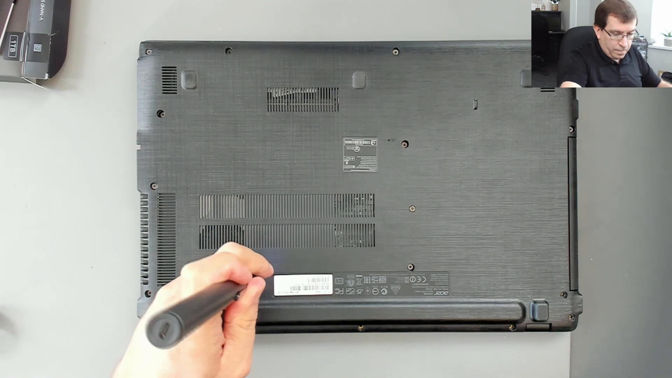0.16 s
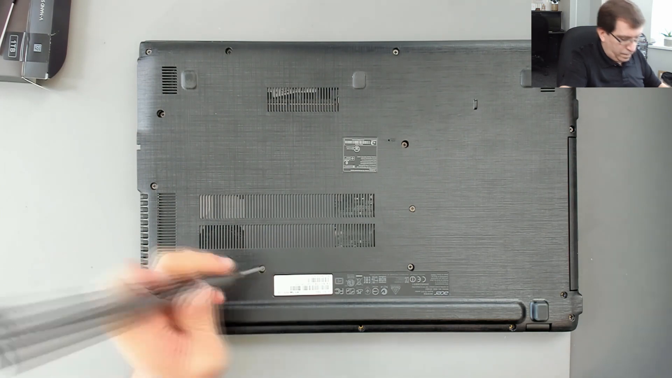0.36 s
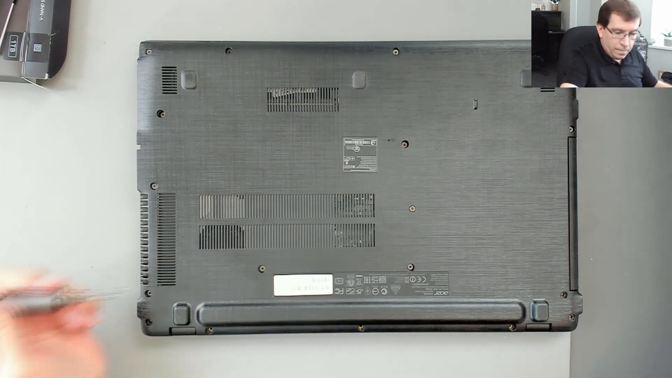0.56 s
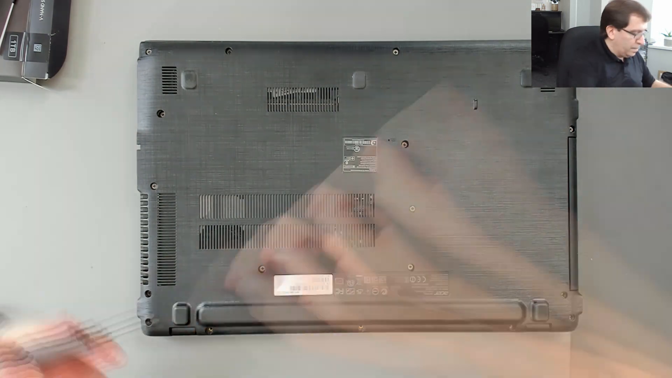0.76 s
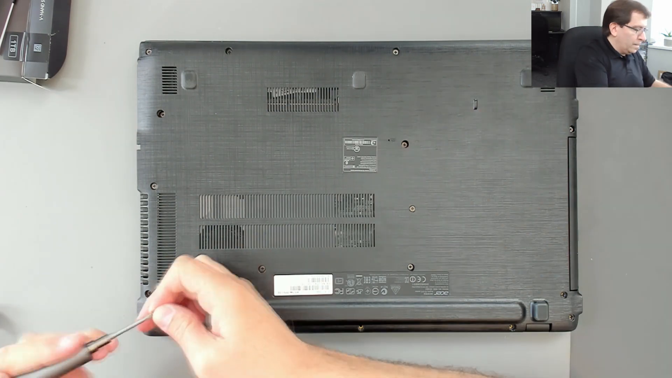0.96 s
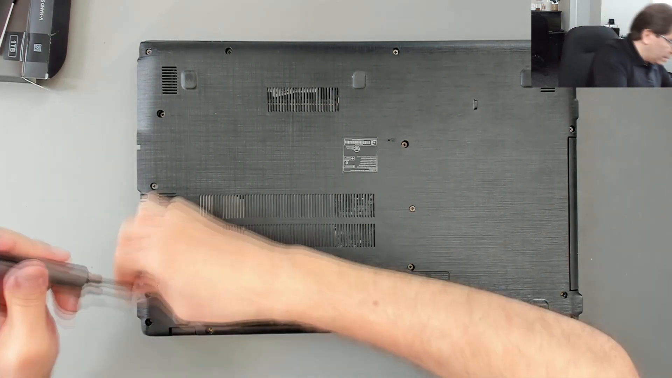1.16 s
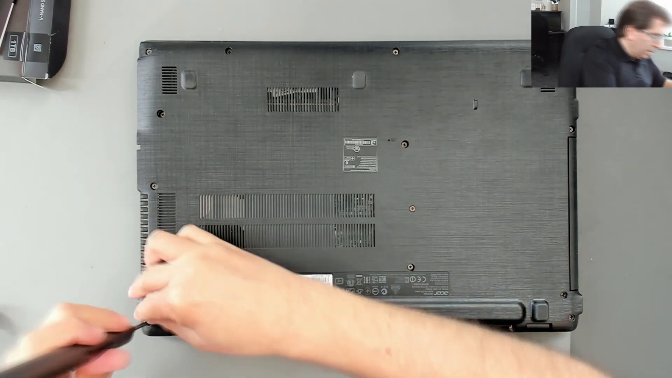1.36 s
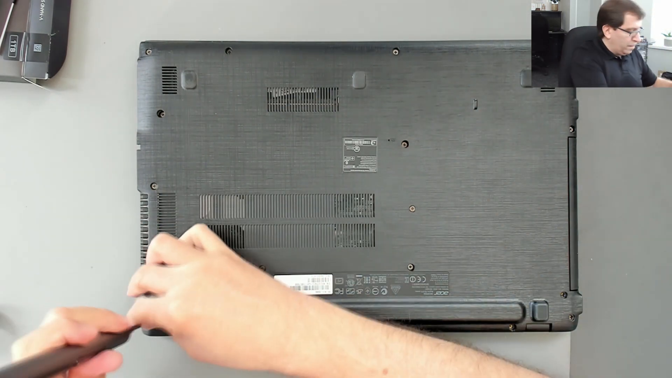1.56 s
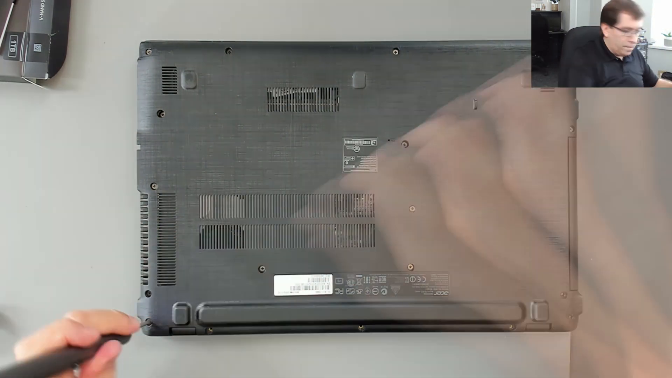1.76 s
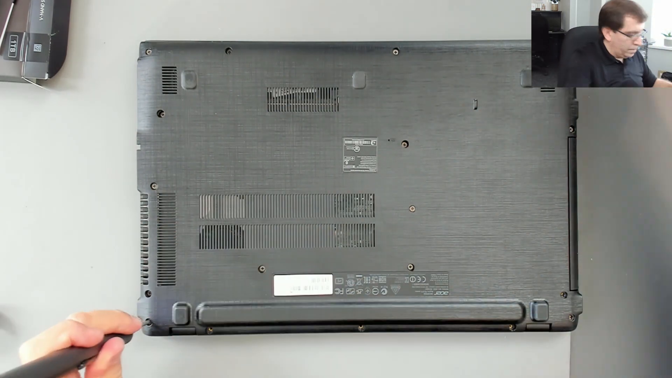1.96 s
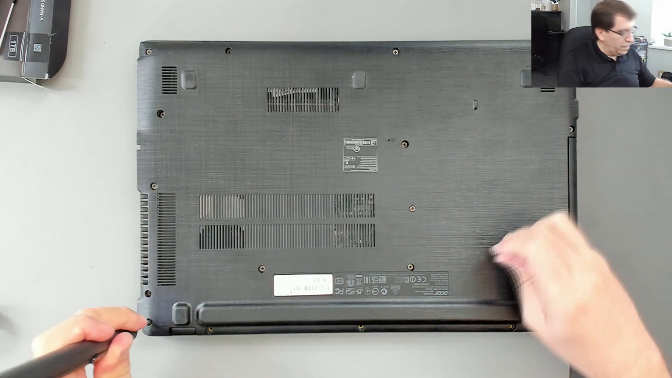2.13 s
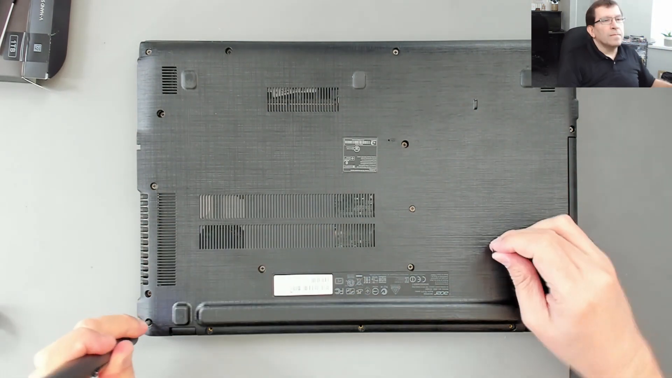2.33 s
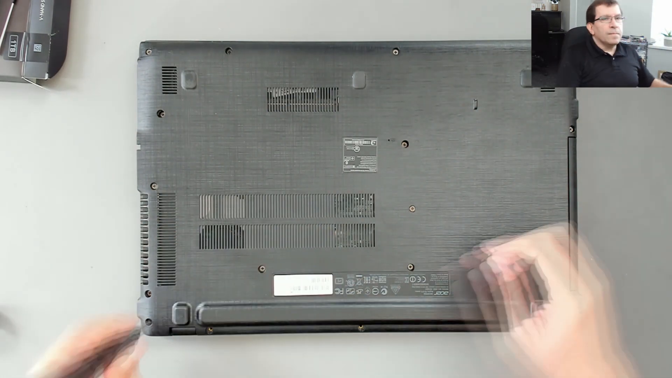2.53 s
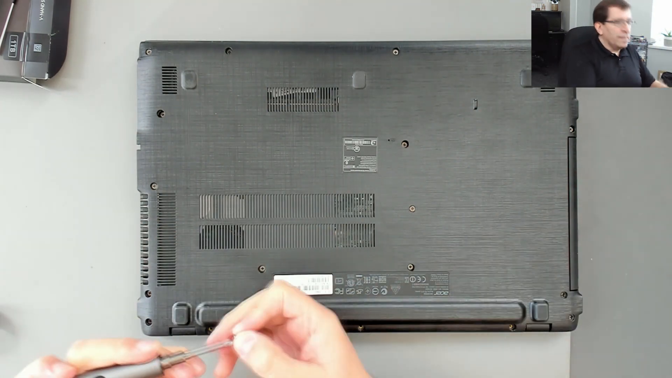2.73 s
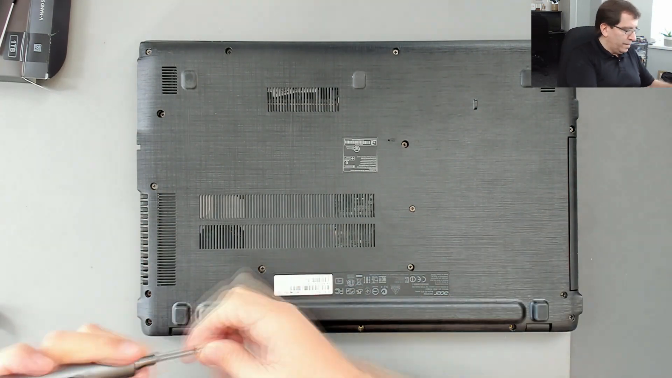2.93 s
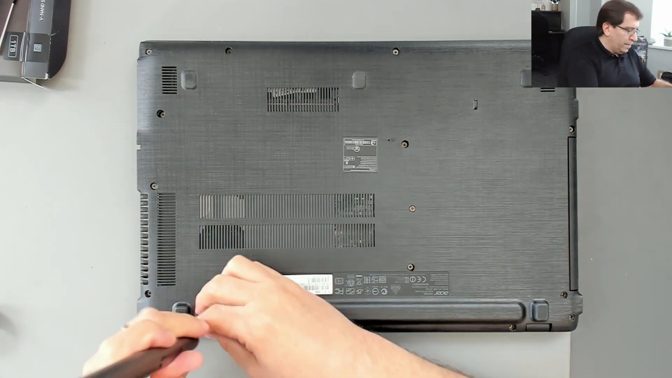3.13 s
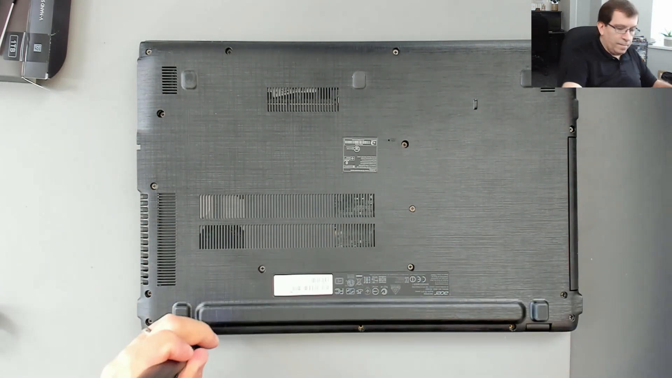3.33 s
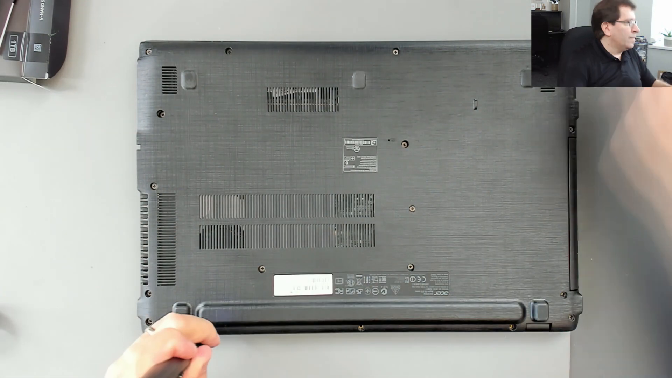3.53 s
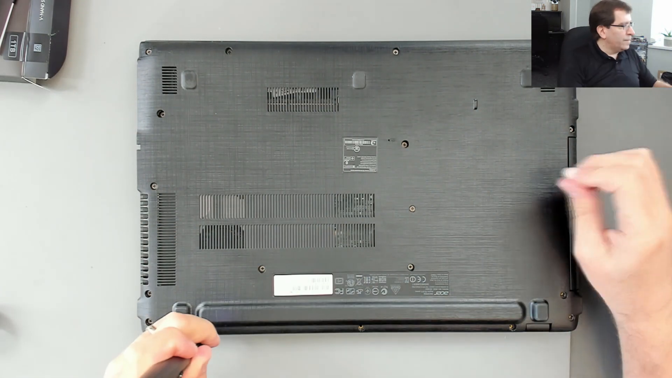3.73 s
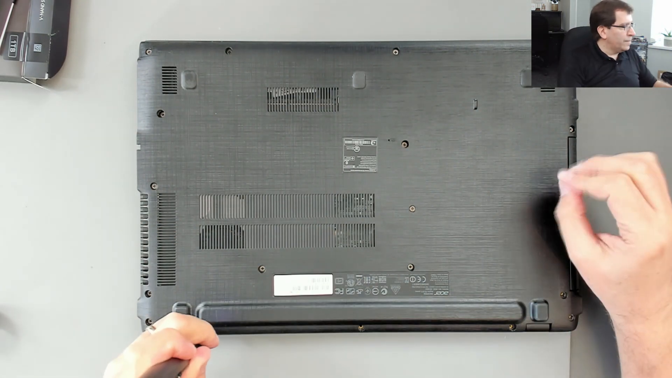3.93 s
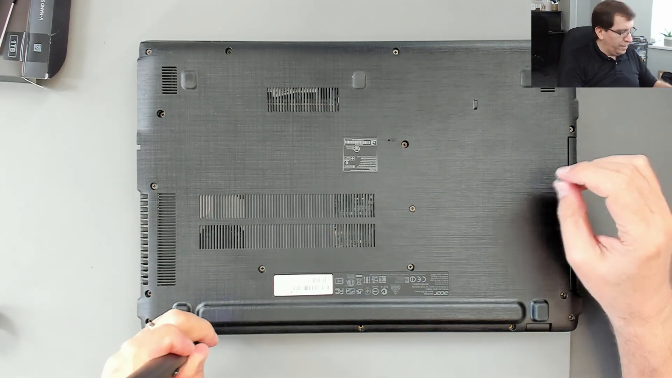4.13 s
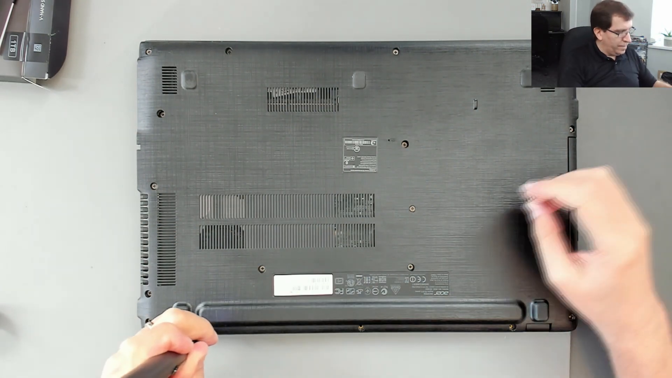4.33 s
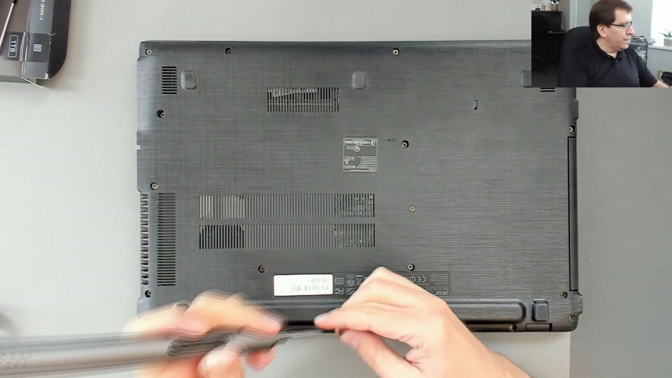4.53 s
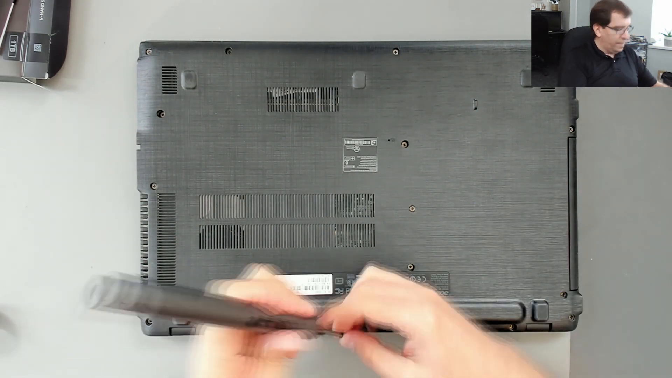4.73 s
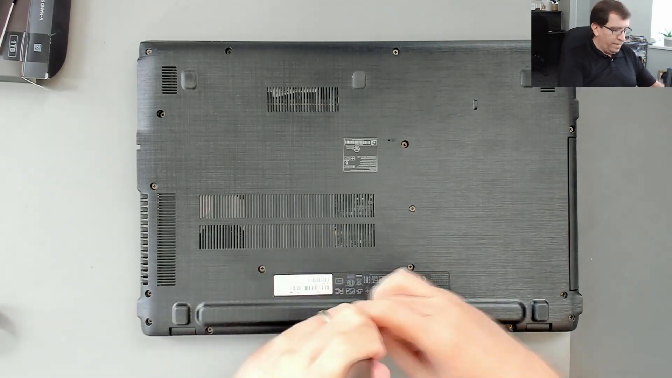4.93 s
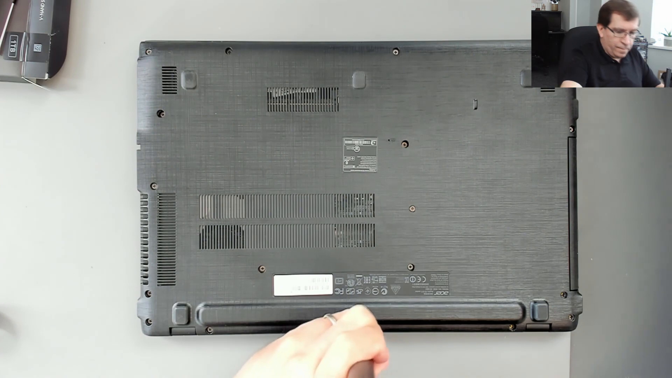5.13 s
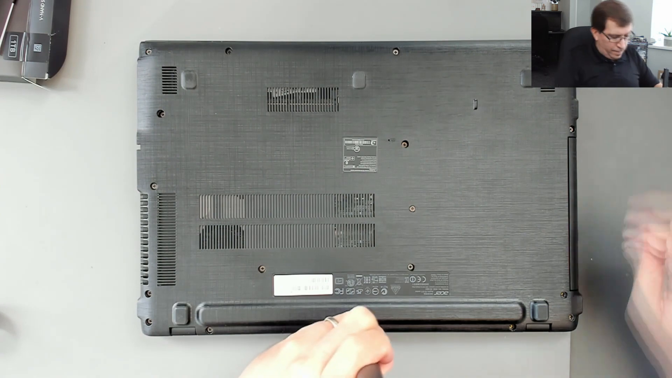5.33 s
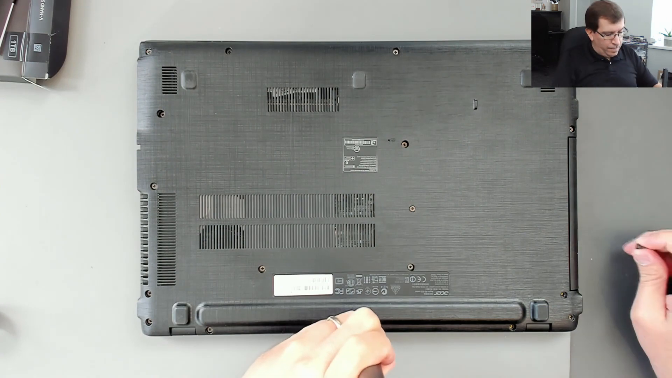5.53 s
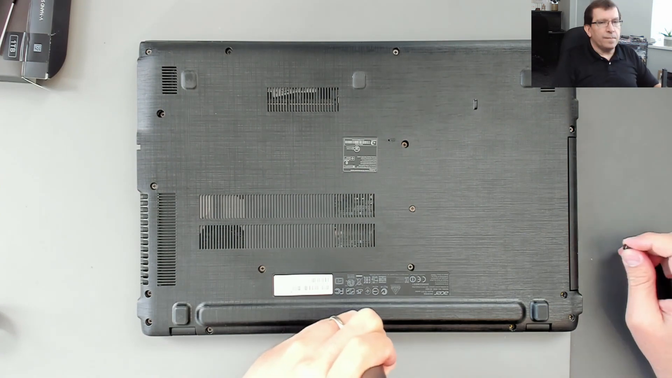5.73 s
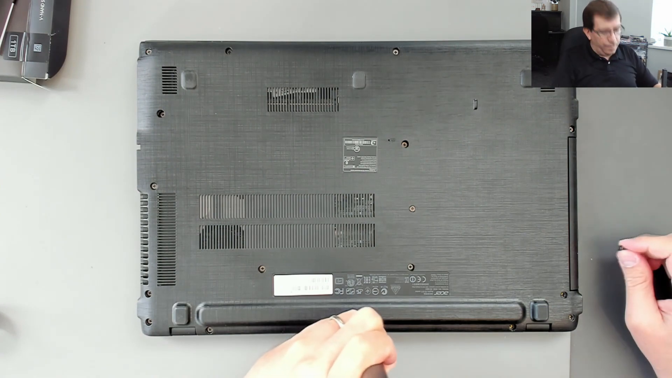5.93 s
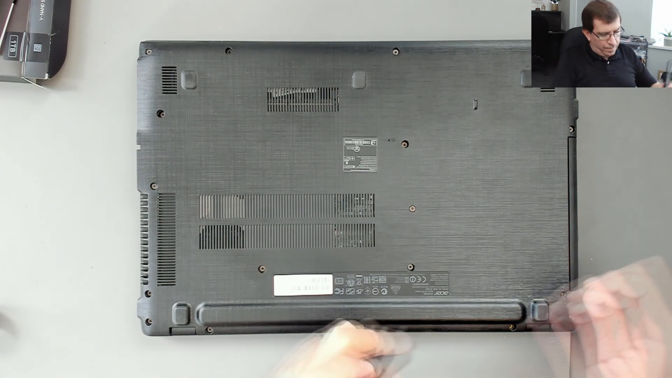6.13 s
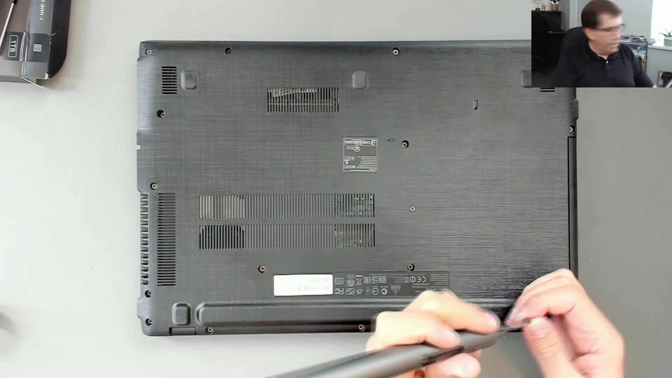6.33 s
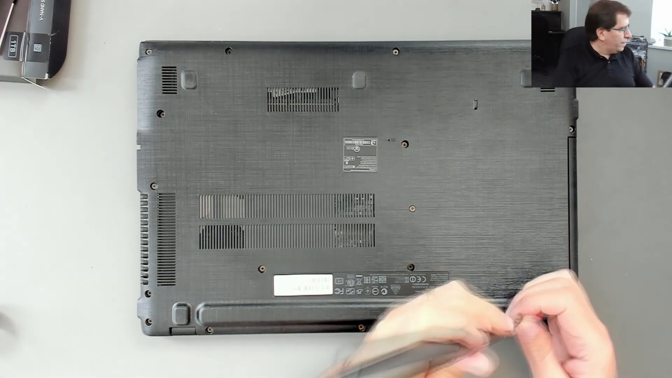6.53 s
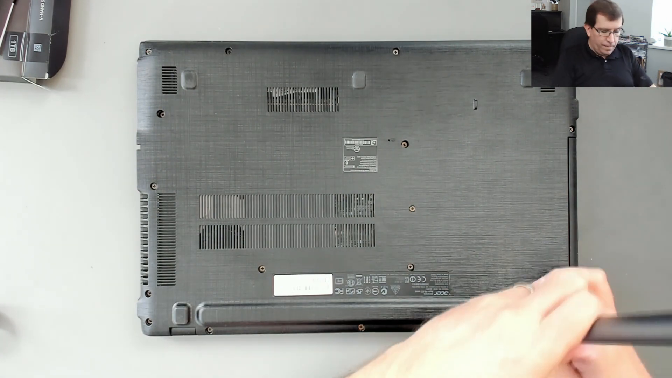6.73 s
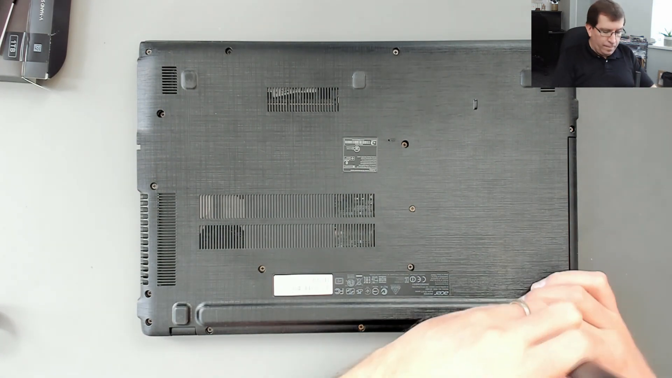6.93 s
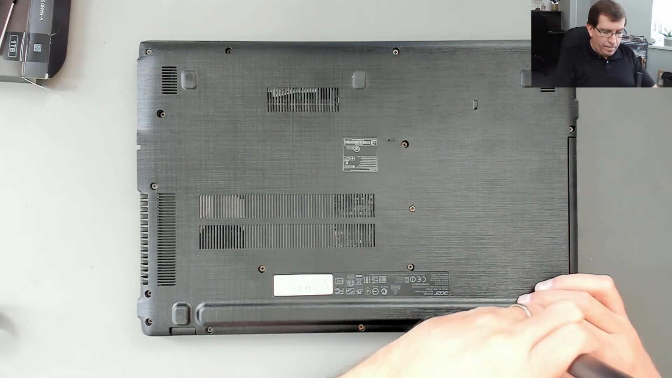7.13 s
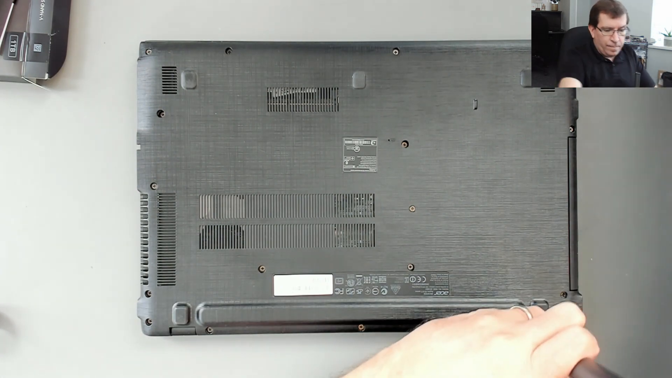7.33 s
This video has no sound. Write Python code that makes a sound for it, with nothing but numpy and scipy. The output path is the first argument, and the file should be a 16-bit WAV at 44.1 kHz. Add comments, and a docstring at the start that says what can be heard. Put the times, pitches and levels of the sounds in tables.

```python
"""A thin motor whine and a gritty gear rasp: a pen-sized electric screwdriver drives screws into a
laptop's plastic cover in five short runs. The motor sags under load while tiny gear teeth rattle the
barrel. Between runs the bit knocks into the next screw head and rings the laptop, hands brush the cover
and the bench rumbles. One close microphone in a quiet room."""
import sys
import numpy as np
from scipy import signal
from scipy.fft import rfft, irfft
from scipy.io import wavfile
from scipy.ndimage import uniform_filter1d

SR = 44100
rng = np.random.default_rng(int(sys.argv[2]) if len(sys.argv) > 2 else 0)


def generate_wav(sig):
    """Save sig (samples, or channels by samples) to the path in sys.argv[1] as 16-bit PCM at SR."""
    pcm = np.round(np.clip(np.atleast_2d(sig).T, -1, 1) * 32767).astype(np.int16)
    wavfile.write(sys.argv[1], SR, pcm)


N = 325458
TIME = np.arange(N) / SR

# Table levels are relative: each layer adds its own trim.
# trigger pulls: on/s, off/s, growl/dB, rasp/dB, sizzle/dB, rise of rasp and sizzle/(dB/s)
RUNS = [(-0.07, 0.253, -44.5, -46, -45, 11), (1.743, 2.517, -47, -47.5, -51, 9),
        (3.236, 4.413, -46.5, -43.5, -45.5, 2.5), (5.041, 6.107, -43.5, -45, -46.5, 7),
        (7.078, 7.402, -45.5, -46, -46.5, 23)]
# motor curves, one table a run: t/s, whine pitch/Hz, wobble/Hz, level/dB, gear strain (0-1)
MOTOR = [
    [(0.0, 651.5, 2, -50.5, 0), (0.15, 638, 3.5, -47, 0.77), (0.24, 634, 3, -51, 0.6),
     (0.275, 616, 3, -69, 0.6)],
    [(1.8, 612, 2, -51.5, 0.7), (1.93, 638.3, 2.3, -57.5, 0), (2.07, 634.7, 3, -55, 0.02),
     (2.13, 631, 5.55, -47.5, .1), (2.32, 625.7, 3.5, -42.5, 0.4), (2.46, 633.4, 6, -49, 0.01),
     (2.54, 582, 3.7, -63, 0.26)],
    [(3.27, 609, 2.96, -52, 0.5), (3.34, 628.7, 5, -38.5, 0.17), (3.53, 629.5, 6.7, -35.5, 0.3),
     (3.62, 625.2, 6, -36.5, 0.5), (3.74, 625, 5.5, -35.5, 0.72), (3.84, 603.4, 2, -43, 0.86),
     (3.97, 576.2, 2.4, -52, 0.88), (4.18, 596, 2, -43, 0.99), (4.28, 610.4, 1.8, -46, 0.86),
     (4.375, 623.5, 1.4, -41.5, 1), (4.42, 609.6, 2, -84, 0.8)],
    [(5.09, 621, 5, -47.5, 0.3), (5.15, 634.4, 5, -42.5, 0.61), (5.35, 643.3, 3.8, -40, 0.3),
     (5.58, 643, 6, -40, 0), (5.73, 629.3, 11, -44, 0.43), (5.85, 621, 15, -44.5, .2),
     (6.04, 621, 15, -44, 0), (6.125, 621, 8, -60, 0.1)],
    [(7.11, 636, 5.4, -52.5, 0.13), (7.185, 627, 9, -46.5, 0.69), (7.25, 639, 4, -41.5, 0.12),
     (7.38, 641.5, 3.5, -40, 0.51)],
]
# the grip in each run: level/dB of whine harmonics 1, 2, 3, 5, 6, 7, bench rumble/dB, cover shudder/dB
GRIPS = [(-9, 2, -7, 1, -13.5, -6.5, -42.5, -48), (-5, 1, -8.5, -23, -15.5, -15, -46, -42),
         (-9, 0.83, -2, -3.5, -22, -19, -42.5, -43), (-8, .5, .5, -2.5, -21, -8.5, -44.5, -46.5),
         (-12.5, 1.1, -3, 3.5, -13, -17, -42.5, -46)]
# bit and fingers strike the cover: t/s, boom/dB, thud/dB, clack/dB, tick/dB
KNOCKS = [(0.381, -48, -64, -50, -67), (0.737, -44, -51, -52, -77), (0.749, -50, -46, -47, -58),
          (1.342, -49, -41.5, -67, -78), (1.439, -50, -31, -44, -74), (1.479, -56, -31.5, -42, -55),
          (1.575, -54.5, -32, -46.5, -66), (1.634, -51, -32.5, -55, -65), (1.67, -30, -20, -40, -48),
          (1.684, -13.5, -15, -30, -30), (1.718, -17, -8.5, -27, -28.5), (1.808, -48, -33, -58, -66),
          (2.155, -46, -33.5, -50, -60), (2.276, -38, -35, -46, -62), (2.53, -45, -35.5, -48, -63),
          (3.002, -42, -60, -49, -53.5), (3.172, -30, -40, -38, -66), (3.188, -15, -28.5, -40, -44),
          (3.203, -29, -39, -33.5, -37.5), (4.48, -53, -52, -48, -44), (4.658, -71, -65, -77, -65),
          (4.704, -52, -60, -78, -62), (4.919, -54, -36, -37.5, -57), (4.981, -29, -32, -26.5, -40.5),
          (4.99, -13, -29, -26, -33), (5.005, -17, -51, -16, -32), (5.022, -38, -40, -22, -35),
          (5.116, -34.5, -48, -37.5, -29.5), (6.143, -59.5, -50, -36.5, -53), (6.166, -52, -54, -49, -37),
          (6.81, -44, -32, -54, -70), (6.93, -34, -39.5, -50, -62), (6.946, -46, -36.5, -49, -59),
          (7.035, -50, -29.5, -44, -49), (7.049, -33, -33, -27.5, -35)]


def from_db(db):
    """Decibels to gain."""
    return 10 ** (np.asarray(db) / 20)


def rms_one(x):
    """Scale to unit power."""
    return x / np.sqrt(np.mean(x ** 2) + 1e-20)


def cut(x, hz, kind, order=2):
    """Butterworth filter."""
    return signal.sosfilt(signal.butter(order, hz, kind, fs=SR, output="sos"), x)


def coloured(x, spectrum):
    """Shape a signal with an EQ curve of (f/Hz, level/dB) points; rms 1."""
    hz, db = np.transpose(spectrum)
    log_hz = np.log(np.arange(N // 2 + 1) * SR / N + 1e-3)
    gain = from_db(np.interp(log_hz, np.log(hz), db, left=-120, right=-120))
    return rms_one(irfft(rfft(x) * gain, N))


def noise(spectrum):
    """Steady noise of a given colour."""
    return coloured(rng.standard_normal(N), spectrum)


def drift(rate_hz):
    """Random wander, mostly slower than the given rate; rms 1."""
    hz = np.arange(N // 2 + 1) * SR / N
    return rms_one(irfft(rfft(rng.standard_normal(N)) / (1 + (hz / rate_hz) ** 2), N))


def gate(start, end, fade_s):
    """Fully open from start to end, with a linear fade on either side."""
    return np.clip(1 + np.minimum(TIME - start, end - TIME) / fade_s, 0, 1)


def per_run(values):
    """At each sample, the value that belongs to the latest run."""
    return np.asarray(values)[np.searchsorted([run[0] for run in RUNS[1:]], TIME)].T


def screwdriver(turn_s=0.103, jitter=0.0016, slip_skew=0.59, throb_db=3):
    """One shaft drives whine and gears; each turn it slows as the screw binds; the whine dips on the slip."""
    # one moment in each run when the screw slips free: t/s
    slips = [0.095, 2.296, 3.545, 5.853, 7.225]
    curve_s, *curves = np.vstack(MOTOR).T
    pitch, wobble_hz, whine_db, strain = (np.interp(TIME, curve_s, curve) for curve in curves)
    turn = 2 * np.pi * (TIME - per_run(slips)) / turn_s
    pitch += wobble_hz * (np.sin(turn) + slip_skew * np.sin(2 * turn))
    phase = 2 * np.pi * np.cumsum(pitch * (1 + jitter * drift(37))) / SR
    return whine(phase, whine_db - throb_db * np.cos(turn), strain) + gearbox(phase)


def whine(phase, whine_db, strain, trim_db=0.4, skirt_db=-19, skirt_hz=45, mesh_flutter_db=3.5):
    """Motor harmonics; play in the gears roughens the higher ones, and load brings out the tooth mesh."""
    # motor harmonics: multiple of the whine, gain at full strain/dB, flutter (0-1)
    harmonics = [(1, 1, .65), (2, -4.5, .25), (3, 3, .6), (5, -2.5, .65), (6, 2, .5), (7, 0, .5)]
    # tooth-mesh tones: multiple of the whine, free-running level/dB, strained level/dB
    mesh_tones = [(3.8, -78.5, -58.5), (4, -72.5, -49.5), (4.33, -72, -51), (10, -78, -55.5),
                  (12, -66, -45.5)]
    out = np.zeros(N)
    for (multiple, strain_db, flutter), grip_db in zip(harmonics, per_run(GRIPS)):
        angle = multiple * phase + rng.uniform(0, 2 * np.pi)
        skirt = np.sqrt(multiple) * (drift(skirt_hz) * np.sin(angle) + drift(skirt_hz) * np.cos(angle))
        # the loose bit carries each tone unevenly, so it flutters and briefly drops out
        contact = np.clip(1.05 + flutter * drift(20), 0.05, 1.4)
        tone = contact * np.sin(angle) + from_db(skirt_db) * skirt
        out += from_db(whine_db + grip_db + strain * strain_db + trim_db) * tone
    for multiple, free_db, strained_db in mesh_tones:
        level = from_db(free_db + strain * (strained_db - free_db) + mesh_flutter_db * drift(30))
        out += level * np.sin(multiple * phase + 0.63 * drift(60))
    motor_on = sum(gate(curve[0][0], curve[-1][0], fade_s=0.018) for curve in MOTOR)
    return np.sqrt(2) * out * motor_on


def worn_teeth(phase, cycles):
    """The same worn teeth come round every few cycles: a dense comb of faint overtones."""
    wear = signal.resample(rng.standard_normal(64 * cycles), 8 * 64 * cycles)
    revolutions = phase / (2 * np.pi * cycles)
    return rms_one(np.interp(revolutions, np.arange(len(wear)) / len(wear), wear, period=1))


def shifting_contacts(x, depth_db, width_hz=170, span_s=0.11, frame=1024):
    """Narrow bands swell and fade on their own as the contacts shift."""
    hz, t, bands = signal.stft(x, SR, nperseg=frame)
    swell = rng.standard_normal(bands.shape)
    for _ in range(2):
        swell = uniform_filter1d(swell, round(width_hz / hz[1]), axis=0)
        swell = uniform_filter1d(swell, round(span_s / t[1]), axis=1)
    return signal.istft(bands * from_db(depth_db * rms_one(swell)), SR, nperseg=frame)[1][:N]


def running(on, off, spin_up_s=0.047, coast_s=0.078):
    """The gears spin up, hold while the trigger is held, then coast to rest."""
    spin_up = np.clip((TIME - on) / spin_up_s, 0, 1)
    return spin_up * from_db(-60 * np.clip((TIME - off) / coast_s, 0, 2) ** 2)


def gearbox(phase, comb_db=-3, split_hz=6500, growl_db=2, rasp_db=0.5, sizzle_db=1.32,
            seating_db=0.5, seating_s=0.083, linger_s=0.011):
    """Tiny tooth impacts, partly repeating, rattle the barrel, brighter as the screw tightens."""
    # lower resonances of the barrel: f/Hz, level/dB
    barrel_colour = [(250, 1), (500, -4), (850, -10.5), (1100, -7.5), (1500, 3), (1900, 2.5), (2150, 3),
                     (2450, 0.5), (2850, -3), (3200, 3.5), (3600, -1), (4200, -28)]
    # gear treble, changing with the grip, one curve a run: f/Hz, level/dB
    treble_colours = [
        [(2060, -39), (3500, -28), (3780, -7), (4070, -12), (4480, -5), (6100, -9), (7180, -5), (7750, -3),
         (8200, -1.5), (9600, 5.5), (10600, -2.5), (13900, -3), (15800, -4)],
        [(2060, -67), (3500, -21.5), (4020, -11.5), (4420, -13.5), (5210, -14), (5550, -9), (6170, -18),
         (6790, -13), (7950, -9), (9420, -1), (10400, -6.5), (12800, -6), (14200, -12), (15100, -8),
         (15800, -12)],
        [(2060, -26), (3500, -4), (3970, -4), (4860, -1), (6100, -7), (6370, -11), (6660, -10), (6870, -6.5),
         (7230, -10), (8000, -5), (9240, -1), (11400, -7), (12400, -8), (14700, -10), (15800, -12)],
        [(2060, -9.5), (3500, -9.5), (3630, -28), (3900, -4), (4340, -4), (4830, -4.5), (5310, -3), (5830, -9),
         (6700, -8.5), (9540, -1), (10300, -6.5), (11100, -2), (11700, -5.5), (13600, -5), (15800, -15)],
        [(2060, -7), (3500, -10), (3900, -5), (4180, -5), (4560, -6), (4680, -7), (5240, -1.5), (6700, -16.5),
         (7800, -8.5), (9600, -10), (13700, -15), (15800, -23)],
    ]
    impacts = rng.standard_normal(N)
    impacts += from_db(comb_db) * (worn_teeth(phase, cycles=5) + worn_teeth(phase, cycles=7))
    flicker = from_db(-1.4 * drift(120) + 1.19 * drift(22))
    impacts *= (1 + 0.12 * np.cos(phase)) * flicker
    impacts = shifting_contacts(impacts, depth_db=2.1)
    barrel = coloured(impacts, barrel_colour)
    out = np.zeros(N)
    for (on, off, growl, rasp, sizzle, rise), colour in zip(RUNS, treble_colours):
        treble = coloured(impacts, colour)
        low, high = (rms_one(cut(treble, split_hz, kind, order=5)) for kind in ("low", "high"))
        tightening = from_db(rise * np.clip(TIME - on, 0, off - on))
        grind = from_db(growl + growl_db) * barrel + from_db(rasp + rasp_db) * tightening * low
        out += grind * running(on, off)
        swell_db = seating_db * np.exp(-((TIME - off) / seating_s) ** 2)   # the screw seats
        out += from_db(sizzle + sizzle_db + swell_db) * tightening * high * running(on, off + linger_s)
    return out


def room_tone(air_db=-59):
    """A bed of soft air noise with a low hum."""
    # air in the room: f/Hz, level/dB
    air_colour = [(18, -30), (30, 5.5), (190, -9), (240, -10.5), (374, -8), (415, -19), (629, -14),
                  (774, -16), (1140, -19), (1830, -33), (2080, -30.5), (2490, -39.5), (9390, -47),
                  (15000, -52.5)]
    # room hum: f/Hz, level/dB
    hum_tones = [(118.4, -64), (226, -86), (290.7, -69), (360.7, -74.5), (452.2, -75.5)]
    hum = sum(from_db(db) * np.sin(2 * np.pi * hz * TIME + 0.5 * drift(0.58)) for hz, db in hum_tones)
    return from_db(air_db) * noise(air_colour) + np.sqrt(2) * hum


def touch(start, length, attack_s=0.02, t60=0.22):
    """A touch swells, holds and dies away."""
    attack = np.clip(1 + (TIME - start) / attack_s, 0, 1)
    return attack * from_db(-60 * np.clip((TIME - start - length) / t60, 0, 2))


def levelled_noise(spectrum, span_s):
    """Coloured noise with its swells evened out."""
    x = noise(spectrum)
    return x / np.sqrt(uniform_filter1d(x ** 2, int(span_s * SR)) + 1e-3)


def hands(shudder_db=-5, brush_db=-1, catch_db=3):
    """Leaning and driving shake the bench and the cover; skin catches on the textured plastic."""
    # a hand leans on the laptop: t/s, length/s, bench rumble/dB, cover shudder/dB, skin brush/dB
    presses = [(0.24, 0.046, -42, -41.5, -73), (0.757, 0.026, -36, -42.5, -65),
               (0.883, 0.035, -40, -51, -69), (1.346, 0.052, -50, -49.5, -68.5),
               (1.444, .04, -35.5, -39, -60.5), (1.571, 0.11, -33, -41, -64.5),
               (1.673, 0.069, -23, -29, -48), (1.987, .03, -34, -52, -75), (2.449, 0.089, -37, -37.5, -80),
               (3.011, 0.039, -30, -44.5, -61.5), (3.168, 0.0095, -34, -42, -61),
               (3.209, 0.023, -27, -42, -55), (3.263, 0.12, -37, -48, -75),
               (4.205, 0.24, -37, -41.5, -76.5), (4.923, 0.03, -27.5, -33, -57),
               (4.985, 0.062, -20, -35.5, -57), (5.074, 0.26, -37, -53, -73),
               (6.136, 0.083, -38, -43.5, -64), (6.797, 0.029, -33, -37.5, -61.5),
               (6.945, 0.12, -32, -40.5, -65.5)]
    # fingertips slide lightly over the plastic: t/s, length/s, level/dB
    strokes = [(0.37, 0.01, -66), (0.546, 0.064, -73), (1.04, 0.038, -75), (2.715, .01, -73.5),
               (4.648, 0.046, -76.5), (6.431, .05, -71.5), (6.673, .02, -69)]
    # deep rumble of the bench: f/Hz, level/dB
    bench_colour = [(12, 4), (22, 3.5), (29, -2.5), (42, -2.5), (65, -21), (100, -11), (150, -27),
                    (300, -38.5)]
    # low-mid shudder of the cover: f/Hz, level/dB
    cover_colour = [(90, -1), (160, 1), (200, -4), (240, 3), (285, 7.5), (330, -10), (480, -17.5),
                    (650, -16.5), (1000, -11.5), (2000, -25)]
    # hiss of skin on plastic: f/Hz, level/dB
    skin_colour = [(400, -1), (1300, 8.5), (2200, 0.5), (3000, -2.5), (4300, 0), (6500, -10),
                   (10000, -11.5), (15900, -16)]
    rumble, shudder, brush = from_db([-60, -66, -84])   # hands at rest
    for start, length, bench_db, cover_db, skin_db in presses:
        press = touch(start, length)
        rumble = np.maximum(rumble, from_db(bench_db) * press)
        shudder = np.maximum(shudder, from_db(cover_db) * press)
        brush = np.maximum(brush, from_db(skin_db) * press)
    for (on, off, *_), (*_, bench_db, cover_db) in zip(RUNS, GRIPS):
        drive = running(on, off)
        rumble = np.maximum(rumble, from_db(bench_db) * drive)
        shudder = np.maximum(shudder, from_db(cover_db) * drive)
    for start, length, db in strokes:
        brush = np.maximum(brush, from_db(db) * touch(start, length))
    bench = rumble * levelled_noise(bench_colour, span_s=0.072)
    cover = from_db(shudder_db) * shudder * levelled_noise(cover_colour, span_s=0.036)
    skin = from_db(brush_db + catch_db * drift(150)) * brush * noise(skin_colour)
    return bench + cover + skin


def blows(levels_db):
    """One click for each knock."""
    clicks = np.zeros(N)
    clicks[[round(row[0] * SR) for row in KNOCKS]] = from_db(levels_db)
    return clicks


def ring(clicks, hz, t60):
    """Each click sets a damped sine ringing."""
    decay, step = from_db(-60 / (t60 * SR)), 2 * np.pi * hz / SR
    return signal.lfilter([0, np.sin(step)], [1, -2 * decay * np.cos(step), decay ** 2], clicks + 1e-18)


def dying(clicks, t60):
    """Envelope that jumps at each click and dies away."""
    return signal.lfilter([1], [1, -from_db(-60 / (t60 * SR))], clicks + 1e-18)


def struck(modes, levels_db):
    """Every knock rings every mode, a little differently each time; neighbours swing opposite ways."""
    scatter_db = rng.standard_normal((len(KNOCKS), len(modes)))
    return sum((-1) ** k * ring(blows(levels_db + db + scatter_db[:, k]), hz, t60)
               for k, (hz, db, t60) in enumerate(modes))


def knocks(boom_db=-1, thud_db=1, knock_db=-13, clack_db=-1, tick_db=3, tail_db=-14, soft_hz=700):
    """The tip ticks, the thin cover clacks and the whole laptop thuds, all in one knock."""
    # deepest modes of the laptop on the bench: f/Hz, level/dB, t60/s
    boom_modes = [(63, -1, 0.063), (107, -2.5, .08), (149, 1, 0.022)]
    # its low-mid modes: f/Hz, level/dB, t60/s
    thud_modes = [(187, 0.5, 0.047), (228, 6, 0.047), (267.4, 0.5, 0.09), (331, -13.5, 0.13),
                  (457, -15, 0.081)]
    # hollow midrange modes of the cover: f/Hz, level/dB, t60/s
    knock_modes = [(507, -3, 0.032), (634, 0, 0.07), (694, 2, 0.012), (797, 4, 0.03)]
    # its bright modes: f/Hz, level/dB, t60/s
    clack_modes = [(905, 2, 0.011), (1224, 5.5, 0.01), (1270, -0.5, 0.037), (1417, -9, 0.056),
                   (1740, -11.5, 0.013), (2034, -8.5, 0.027)]
    # contact noise of the tip: f/Hz, level/dB
    tick_colour = [(1200, 10.5), (2200, -1.5), (4500, -0.5), (6500, -9.5), (10000, -10.5), (15900, -17)]
    _, boom, thud, clack, tick = np.transpose(KNOCKS)
    body = struck(boom_modes, boom + boom_db) - struck(thud_modes, thud + thud_db)
    cover = struck(knock_modes, thud + knock_db) + struck(clack_modes, clack + clack_db)
    tips = blows(tick + tick_db)
    skid = dying(tips, t60=0.018) + from_db(tail_db) * dying(tips, t60=0.076)
    skid = cut(skid, 200, "low", order=1)   # the tip takes a moment to seat
    return cut(body, soft_hz, "low") + cover + skid * noise(tick_colour)


def buzzes():
    """Friction keeps single resonances of tool and cover ringing."""
    # rubbed resonances: start/s, end/s, f/Hz, width/Hz, level/dB
    resonances = [(1.39, 1.477, 616, 70, -54), (1.826, 1.85, 5360, 700, -45.5),
                  (1.78, 2.488, 2476, 239, -48.5), (2.083, 2.48, 5160, 443.4, -45.5),
                  (3.04, 3.055, 603, 89, -47), (3.335, 3.747, 1938, 263, -43.5),
                  (3.78, 3.828, 3538, 399.4, -39.5), (4.148, 4.295, 1576, 400, -45.5),
                  (3.857, 4.401, 11240, 707, -48), (5.11, 5.7, 1940, 250, -52.5),
                  (5.399, 5.43, 2800, 352, -47), (5.446, 6.12, 10990, 450, -49.5)]
    out = np.zeros(N)
    for start, end, hz, width, db in resonances:
        buzz = rms_one(cut(rng.standard_normal(N), [hz - width / 2, hz + width / 2], "band"))
        out += from_db(db) * buzz * gate(start, end, fade_s=0.035)
    return out


def room(x, t60=0.15, wet_db=-19, wall_hz=4000, predelay_s=0.004):
    """The walls add a short, dull tail."""
    t = TIME[:SR // 2]
    tail = cut(rng.standard_normal(len(t)), wall_hz, "low") * from_db(-60 * t / t60) * (t > predelay_s)
    return x + from_db(wet_db) * signal.fftconvolve(x, tail / np.linalg.norm(tail))[:N]


def scene():
    """Everything reaches one microphone, alike in both channels."""
    mono = room(screwdriver() + buzzes() + knocks()) + hands() + room_tone()
    return np.array([mono, mono])


def record(dry):
    """A steep high cut takes off the very top."""
    cutoff_hz = 15850
    return signal.sosfilt(signal.ellip(12, 0.1, 90, cutoff_hz, fs=SR, output="sos"), dry)


dry = scene()
out = record(dry)
generate_wav(out)
```